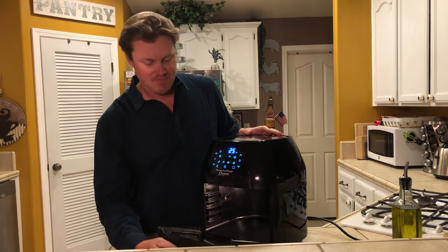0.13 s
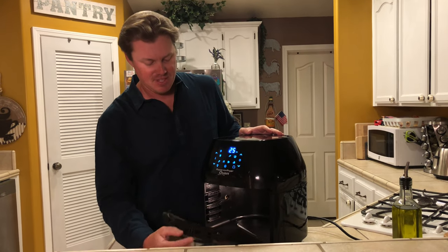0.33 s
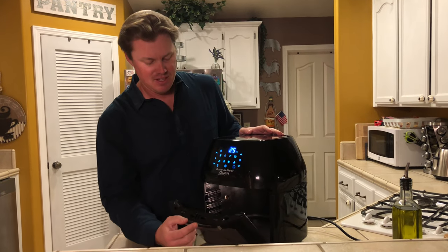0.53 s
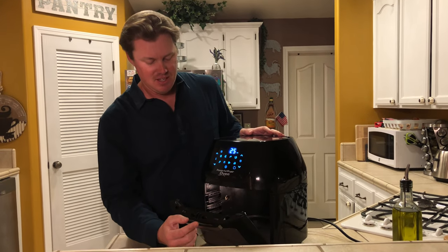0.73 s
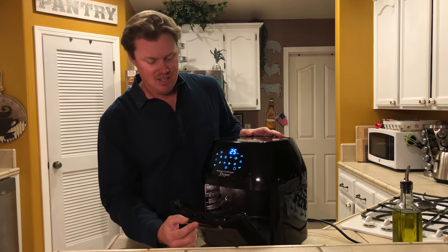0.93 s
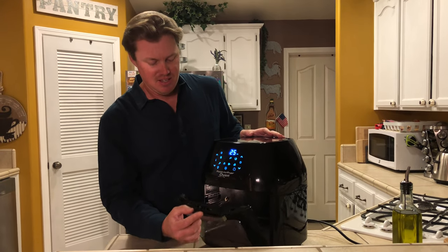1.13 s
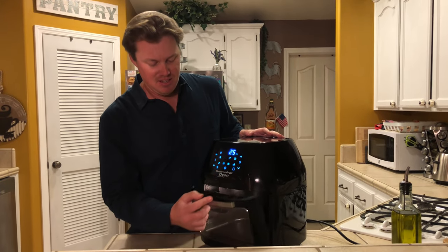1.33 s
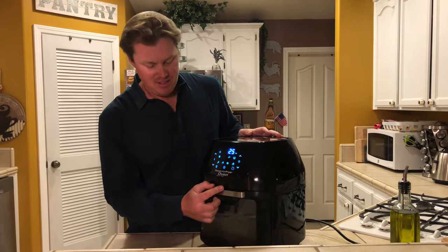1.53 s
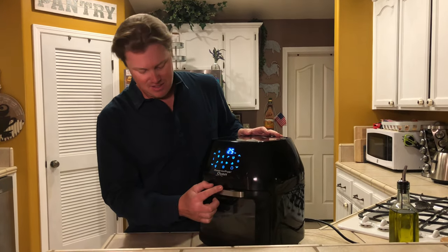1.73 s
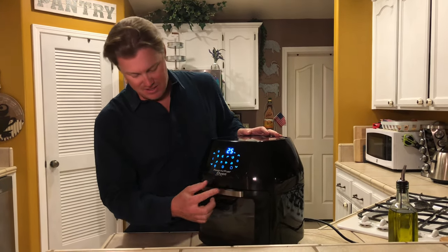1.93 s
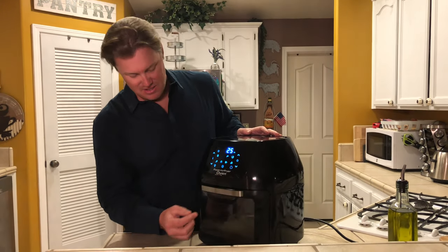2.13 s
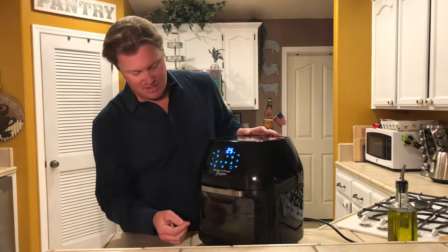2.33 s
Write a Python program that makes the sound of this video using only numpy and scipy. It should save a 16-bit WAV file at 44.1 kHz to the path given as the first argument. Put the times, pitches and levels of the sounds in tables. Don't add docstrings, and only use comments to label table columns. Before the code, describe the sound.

A countertop appliance door snaps and slams shut with one loud, hollow clack after faint ticks, a small clip pop and soft panel bumps; a short hard-room echo follows, over low hiss, with the microphone at room distance.

```python
import sys
import numpy as np
from scipy import signal
from scipy.io import wavfile
from scipy.ndimage import uniform_filter1d

SR = 44100
rng = np.random.default_rng(int(sys.argv[2]) if len(sys.argv) > 2 else 0)


def how_loud(loudness_db):
    steps = np.asarray(loudness_db, float) / 20
    return 10 ** steps


def log_audio(samples):
    frames = np.atleast_2d(samples).T
    limited = np.clip(frames, -1, 1)
    pcm = np.round(limited * 32767).astype(np.int16)
    wavfile.write(sys.argv[1], SR, pcm)


N = 104605

# start_s, level_db, contact_s
SLAMS = [
    (1.4762, -12, 0.0012),
    (1.4797, -8, 0.001),
    (1.487, -23.5, .0012),
    (1.51, -35.5, 0.001),
    (1.583, -27.5, 0.0011),
    (1.75, -49.5, 0.002),
]
# freq_hz, level_db, t60_s
CASE_MODES = [(250, -18.5, 0.11), (322, -2, 0.13), (378, -5.5, 0.051), (443, -11, .09), (489.8, -4, 0.16),
              (588, -1.5, 0.063), (605, -8.5, 0.023), (684, -9, 0.3), (724.7, -5.5, .08),
              (908, -20.5, 0.055), (1360, -16.5, 0.18), (1500, -18, 0.036)]
# start_s, peak_db, length_s
AIR_PUSHES = [
    (1.4766, -10, .002),
    (1.4795, -4, .0032),
]
# start_s, level_db, contact_s
BUMPS = [(.5, -43.5, .003), (.528, -91, .003), (.549, -53.5, .003), (1.015, -36, .003), (1.05, -45.5, .004),
         (1.07, -47.5, .004), (1.115, -52, .004), (1.16, -44, .003), (1.188, -52.5, .003),
         (1.217, -48.5, .003), (1.265, -62, .004), (1.33, -56, .004), (1.395, -57, .004),
         (1.415, -50, .003), (1.4295, -32.5, 0.00099), (1.436, -21.5, .003), (1.442, -22.5, .003)]
# freq_hz, level_db, t60_s
PANEL_MODES = [(158, -12, .12), (186, 0, .05), (290, -6, .04), (565, -12, .05), (678, -9, .05),
               (964, -16, .04)]
# freq_hz, level_db, t60_s
JOLT_MODES = [(126, -14, .25), (95, -30, .3)]
# freq_hz, level_db, t60_s
TRAY_MODES = [(132.6, -42.5, 2.21), (149.04, -53, 2.1), (167, -36, 0.35)]
# start_s, level_db, length_s
LATCH_SNAPS = [
    (1.4595, -23, .001),
    (1.4615, -10, .0008),
    (1.4626, -8, .0006),
    (1.4642, -14, .003),
    (1.468, -17, .005),
    (1.4733, -16, .0015),
    (1.4747, -10, .002),
    (1.4775, -16, .004),
    (1.4835, -18, .004),
]
# freq_hz, width_hz, level_db
LATCH_BODY = [(1574, 700, 11), (2500, 230, -16.5), (3944, 1600, -8), (6100, 2000, 3.5), (7800, 2200, 0),
              (10990, 1300, -3), (14500, 1000, -14.5)]
# start_s, level_db, length_s
CLIP_POPS = [
    (.3738, -36, .0014),
    (.3755, -32, .0012),
]
# freq_hz, width_hz, level_db
CLIP_BODY = [(1400, 700, -9), (1960, 600, -9), (4100, 800, 2), (5300, 800, 0), (7490, 1400, -2),
             (11300, 1800, -7), (13600, 2000, -6)]
# start_s, peak_db, freq_hz, width_hz, length_s
TICKS = [(.016, -57, 1600, 1200, .006), (.03, -58, 2000, 2500, .014), (.054, -58, 1800, 2000, .004),
         (.216, -60, 11500, 5000, .0015), (.2393, -42, 12500, 6000, .001), (.2448, -41, 13500, 6000, .0007),
         (.3663, -45, 10000, 6000, .001), (.4578, -51, 1500, 900, .002), (.458, -57, 3500, 600, .002),
         (.477, -58, 1500, 700, .003), (.477, -59, 3500, 600, .002), (1.115, -58, 1300, 1200, .002),
         (1.428, -45, 3300, 2000, .003), (1.429, -35, 900, 1300, .008), (1.4485, -56, 9000, 7000, .0007),
         (2.342, -55, 11000, 7000, .0015)]
# start_s, length_s, level_db
RUBS = [
    (0, 0.086, -62.5),
    (0.48, 0.11, -63),
    (1.008, .24, -57.5),
    (1.24, 0.11, -71.5),
    (1.382, 0.082, -53.5),
    (1.544, 0.058, -30.5),
    (1.727, 0.068, -57),
]
# freq_hz, width_hz, level_db
RUB_BODY = [(165, 40, 9), (200, 50, 3), (300, 120, -2), (450, 200, -6), (590, 110, -4), (690, 100, -4),
            (1150, 400, -12), (2000, 900, -16)]
# start_s, length_s, freq_hz, width_hz, level_db, second_partial_db
SQUEAK = (.48, .42, 1780, 90, -81, -5)
# freq_hz, t60_s
KITCHEN_T60 = [(60, .5), (170, 0.61), (500, 0.59), (1500, 0.58), (4000, 0.52), (8000, 0.35), (16000, 0.3)]
# freq_hz, density_db_per_hz
AIR_SPECTRUM = [(12, -69), (20, -33), (65, -5), (124, -1.5), (506, -10.5), (1320, -21.5), (1740, -23.5),
                (15200, -31), (16500, -47.5)]


def evened(x):
    return x / np.sqrt(np.mean(x ** 2) + 1e-20)


def read(points, hz):
    f, value = np.transpose(points)
    return np.interp(np.log(hz + 1), np.log(f + 1), value)


def add(mix, start_s, sound):
    part = mix[round(start_s * SR):][:len(sound)]
    part += sound[:len(part)]


def resonate(x, hz, width_hz):
    turn = np.exp(2j * np.pi * hz * np.arange(len(x)) / SR)
    r = np.exp(-np.pi * width_hz / SR)
    return 2 * (turn * signal.lfilter([1 - r], [1, -r], x / turn)).real


def resonate_twice(x, hz, width_hz):
    return resonate(resonate(x, hz, width_hz), hz, width_hz)


def burst(length_s):
    t = np.arange(1500) / SR
    envelope = np.minimum(t / .0002, 1) * np.exp(-(t / length_s) ** 2)
    return rng.standard_normal(1500) * envelope


def ring(modes):
    t = np.arange(SR) / SR
    return sum(how_loud(db - 60 * t / t60_s) * np.sin(2 * np.pi * hz * t) for hz, db, t60_s in modes)


def blows(table):
    force = np.zeros(N)
    t = np.arange(600) / SR
    for start_s, db, contact_s in table:
        push = np.sin(np.pi * np.minimum(t / contact_s, 1)) ** 2
        add(force, start_s, how_loud(db) * push / push.sum())
    return force


def door():
    panel = signal.fftconvolve(blows(BUMPS), ring(PANEL_MODES))[:N]
    case = signal.fftconvolve(blows(SLAMS), ring(CASE_MODES))[:N]
    out = panel - how_loud(-8.5) * case
    for start_s, db, length_s in AIR_PUSHES:
        u = np.arange(0, 1, 1 / (length_s * SR))
        add(out, start_s, -how_loud(db) * np.sin(3 * np.pi * u) * np.sin(np.pi * u))
    return out


def jolt():
    start_s, rise_s = 1.478, 0.0055
    out = np.zeros(N)
    swelling = 1 - np.exp(-np.arange(SR) / SR / rise_s)
    add(out, start_s, ring(JOLT_MODES + TRAY_MODES) * swelling)
    return out


def cracks(table, body):
    out = np.zeros(N)
    for start_s, db, length_s in table:
        spit = burst(length_s)
        x = np.zeros(len(spit))
        for k, (hz, width_hz, gain_db) in enumerate(body):
            x += (-1) ** k * how_loud(gain_db) * resonate_twice(spit, hz, 2 * width_hz)
        add(out, start_s, how_loud(db) * x / abs(x).max())
    return out


def latch():
    return cracks(LATCH_SNAPS, LATCH_BODY)


def handle_clip():
    return cracks(CLIP_POPS, CLIP_BODY)


def ticks():
    out = np.zeros(N)
    for start_s, db, hz, width_hz, length_s in TICKS:
        x = resonate_twice(burst(length_s), hz, width_hz)
        x = resonate(x, hz, 2 * width_hz)
        add(out, start_s, how_loud(db) * x / abs(x).max())
    return out


def swell(start_s, length_s):
    return np.sin(np.pi * np.clip((np.arange(N) / SR - start_s) / length_s, 0, 1)) ** 2


def hinge_rub():
    slips_per_s = 800
    strength = how_loud(rng.exponential(1, N).clip(0, 4))
    slips = rng.standard_normal(N) * strength * (rng.random(N) < slips_per_s / SR)
    rub = np.zeros(N)
    for hz, width_hz, db in RUB_BODY:
        x = resonate(resonate(slips, hz, width_hz), hz, 2 * width_hz)
        rub += how_loud(db) * evened(x)
    return evened(rub) * sum(how_loud(db) * swell(start_s, length_s) for start_s, length_s, db in RUBS)


def hinge_pin():
    start_s, length_s, hz, width_hz, db, second_db = SQUEAK
    hiss = rng.standard_normal(N)
    first = evened(resonate_twice(hiss, hz, width_hz))
    second = evened(resonate_twice(hiss, 2 * hz, 2 * width_hz))
    return how_loud(db) * (first + how_loud(second_db) * second) * np.sqrt(swell(start_s, length_s))


def kitchen(x):
    first_s, fade_in_s = .004, 0.0046
    early_db, early_s = -3.5, 0.018
    low_db, low_hz = -4, 900
    t = np.arange(SR) / SR
    early = 1 + how_loud(early_db) * np.exp(-t / early_s)
    taps = rng.standard_normal(SR) * np.clip((t - first_s) / fade_in_s, 0, 1) * early
    hz, at_s, z = signal.stft(taps, SR, nperseg=256)
    decay_db = -60 * at_s / read(KITCHEN_T60, hz)[:, None]
    tilt_db = low_db / (1 + (hz / low_hz) ** 2)
    z = z * how_loud(decay_db + tilt_db[:, None])
    tail = signal.istft(z, SR, nperseg=256)[1]
    return signal.fftconvolve(x, tail / np.linalg.norm(tail))[:N]


def air():
    level_db, patch_db = -66.5, 0.4
    frames, hz = N // 256 + 5, np.fft.rfftfreq(1024, 1 / SR)
    a, b, patches = rng.standard_normal((frames, 513, 3)).T
    patches = evened(uniform_filter1d(uniform_filter1d(patches, 8, 0), 12, 1))
    z = (a + 1j * b) * how_loud(read(AIR_SPECTRUM, hz)[:, None] + patch_db * patches)
    noise = signal.istft(z, nperseg=1024, noverlap=768)[1][:N]
    return how_loud(level_db) * evened(noise)


def scene():
    highpass = signal.butter(4, 121, "high", fs=SR, output="sos")
    body = signal.sosfilt(highpass, door() + hinge_rub() + hinge_pin())
    snaps = latch()
    small = ticks() + handle_clip()
    echo = how_loud(-7) * kitchen(small) + how_loud(-1.5) * kitchen(snaps) + how_loud(-2) * kitchen(body)
    return (body + jolt() + snaps + small + echo + air())[None]


def low_pass(x):
    return signal.sosfilt(signal.butter(12, 16830, fs=SR, output="sos"), x)


def record(dry):
    taps = signal.firwin(511, 16650, window=("kaiser", 9), fs=SR)
    mix = signal.oaconvolve(dry, taps[None], "same")
    return low_pass(mix)


dry = scene()
out = record(dry)
log_audio(out)
```